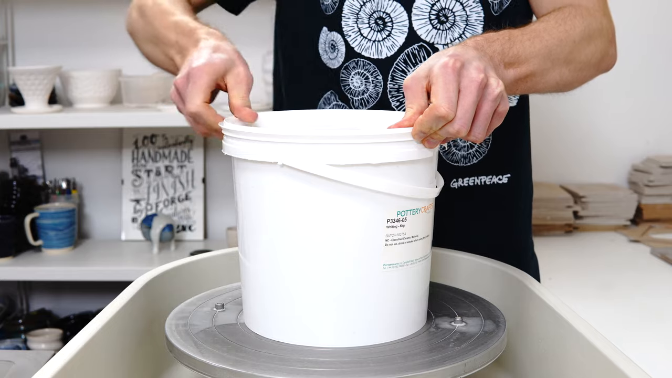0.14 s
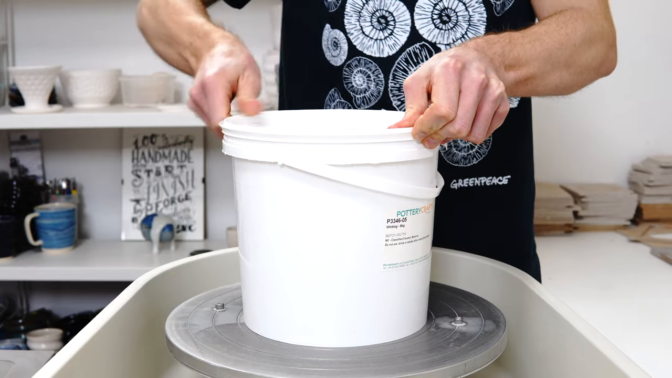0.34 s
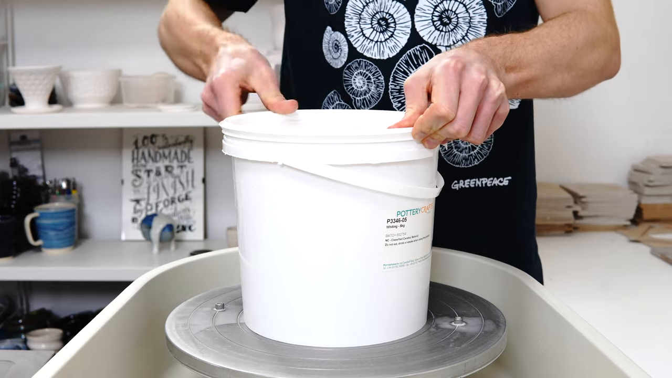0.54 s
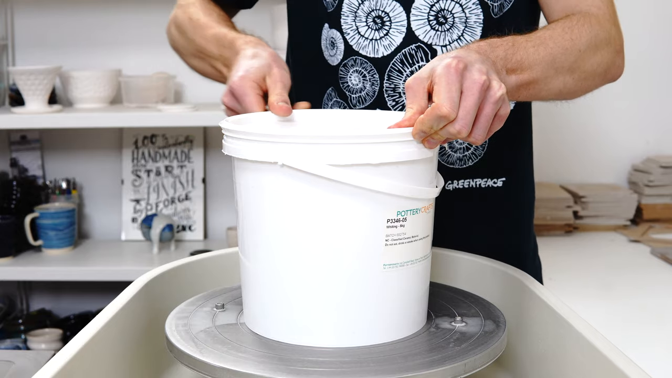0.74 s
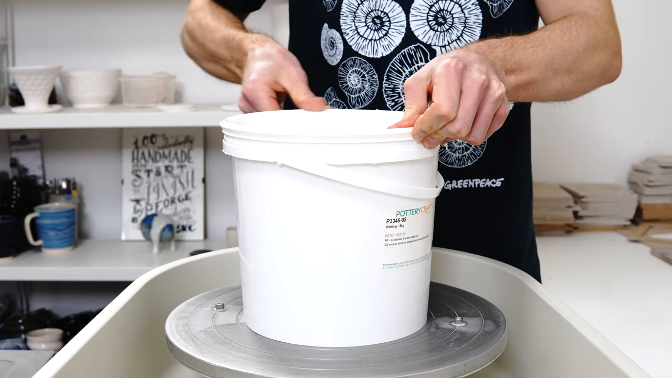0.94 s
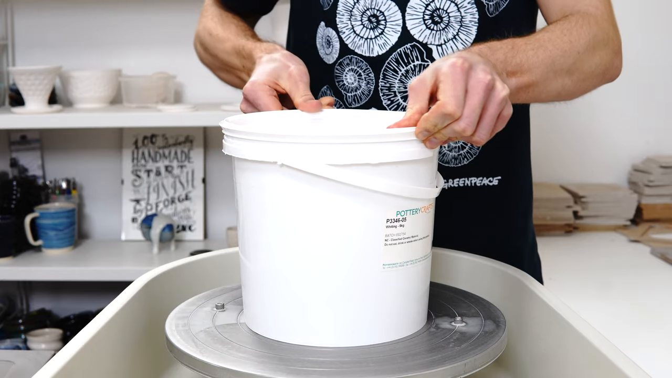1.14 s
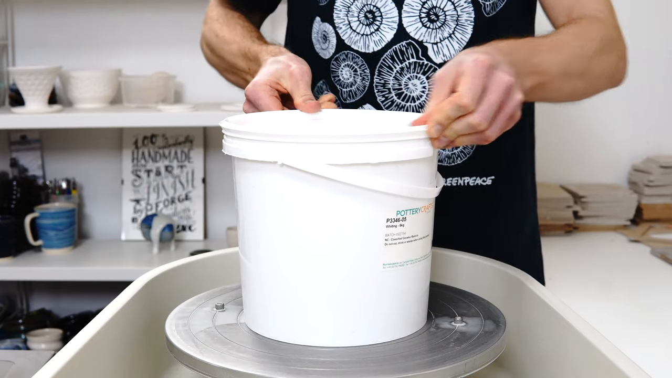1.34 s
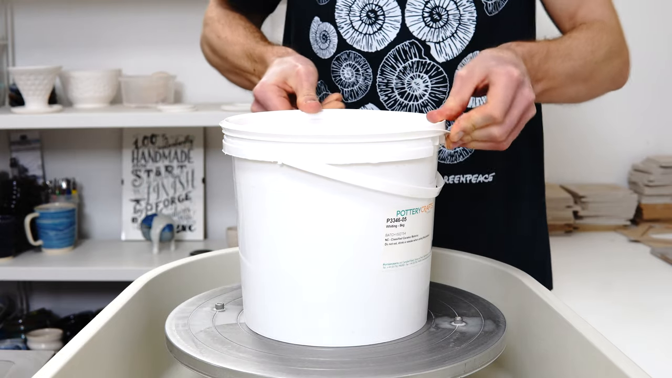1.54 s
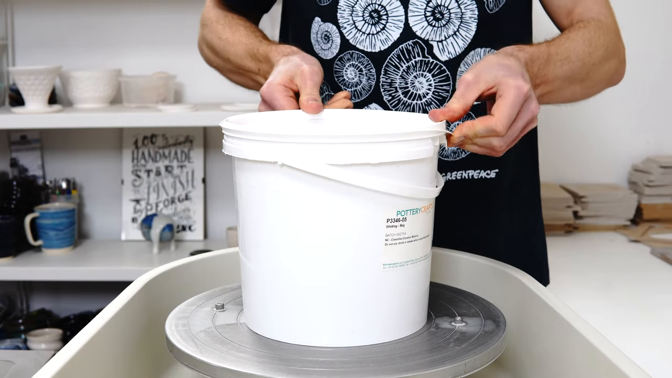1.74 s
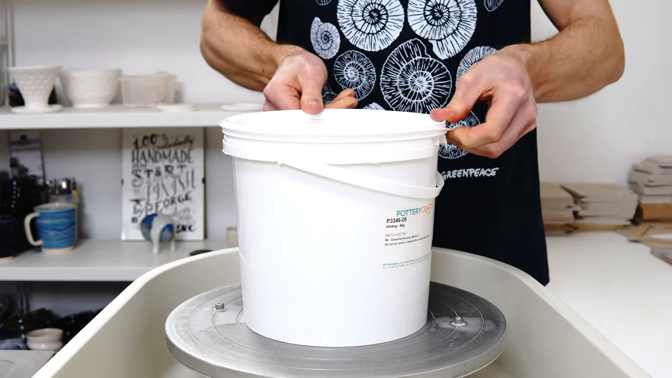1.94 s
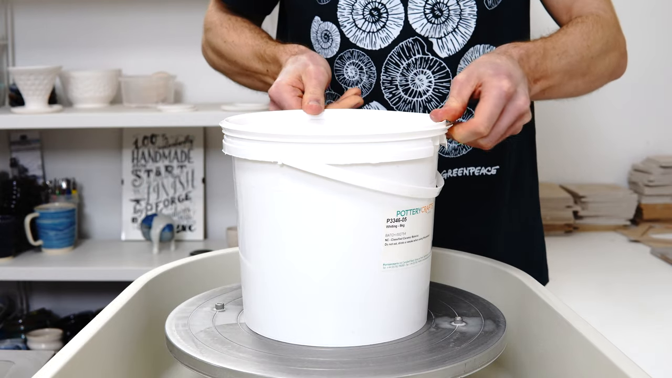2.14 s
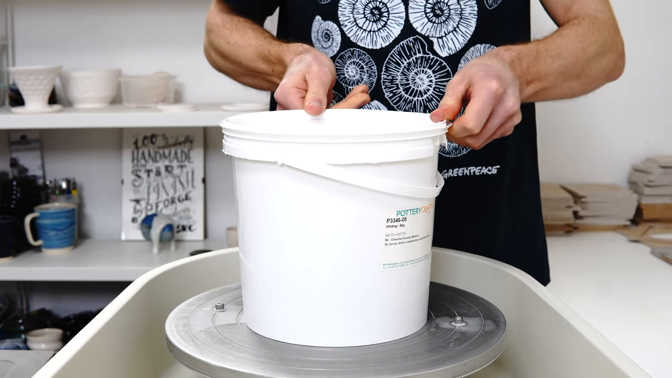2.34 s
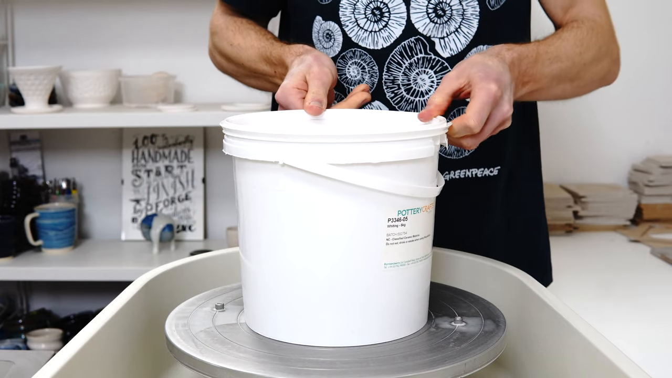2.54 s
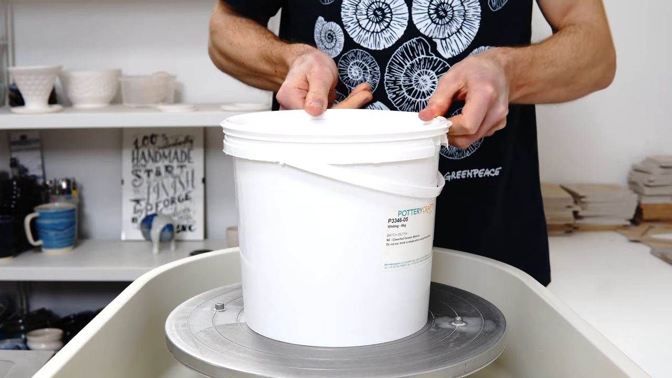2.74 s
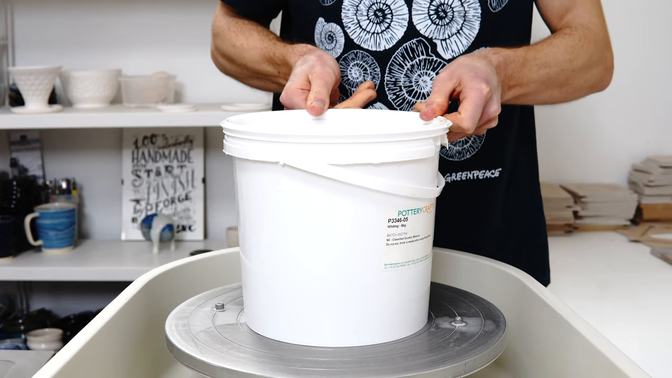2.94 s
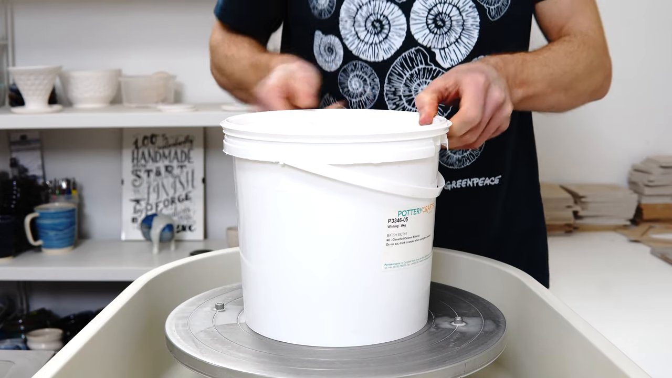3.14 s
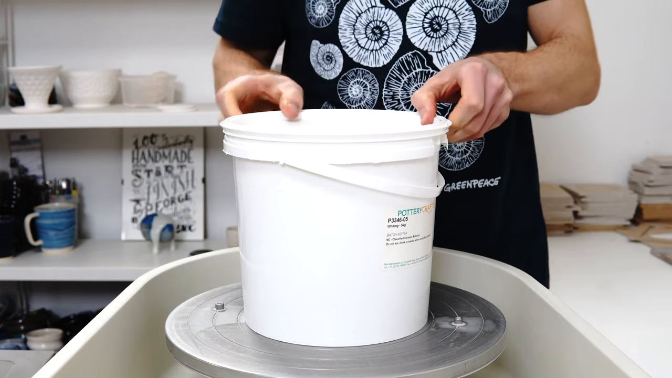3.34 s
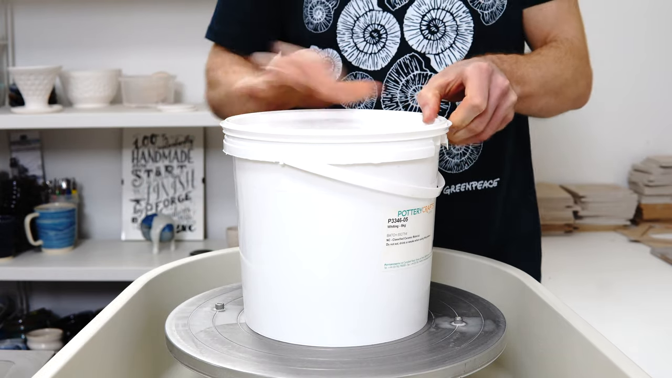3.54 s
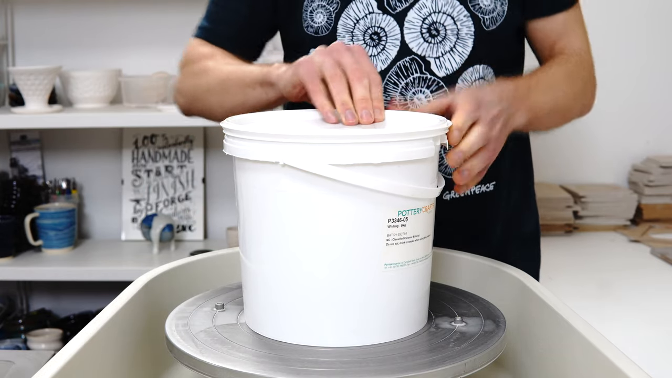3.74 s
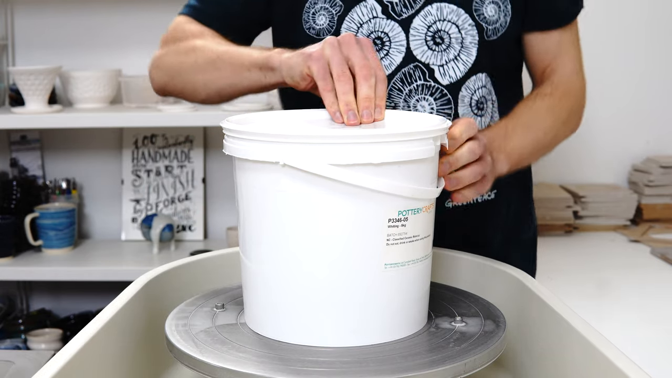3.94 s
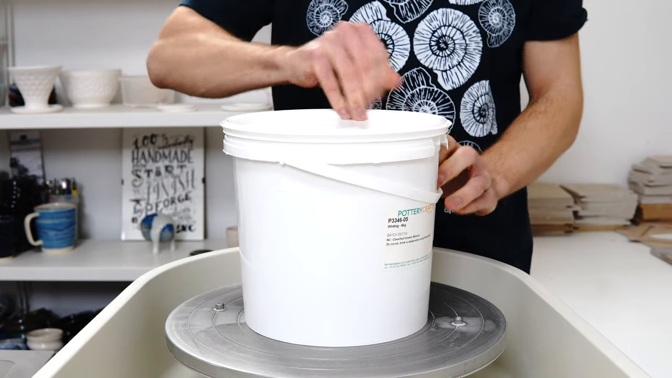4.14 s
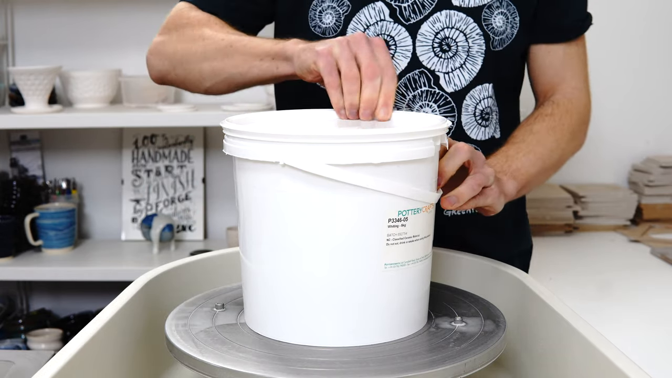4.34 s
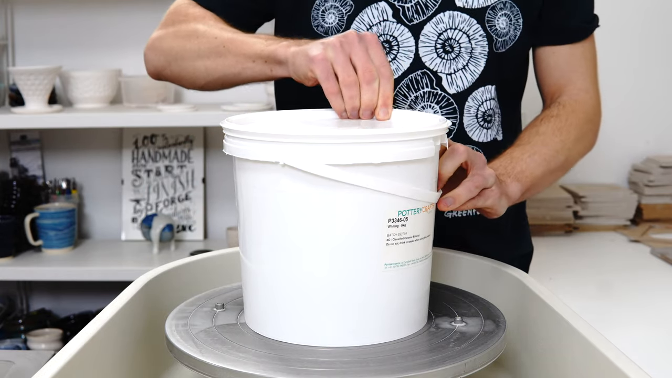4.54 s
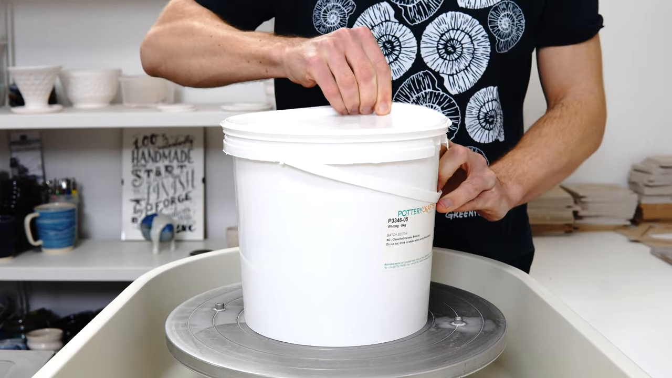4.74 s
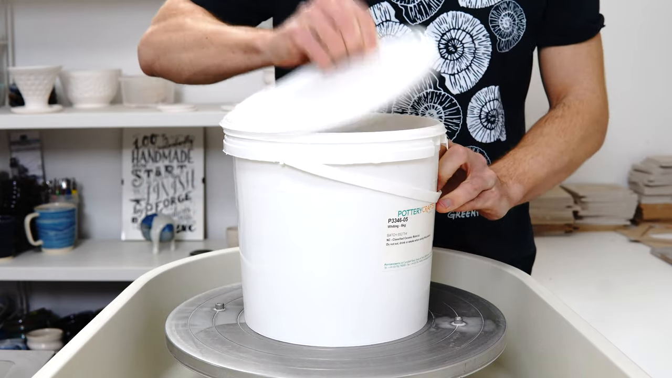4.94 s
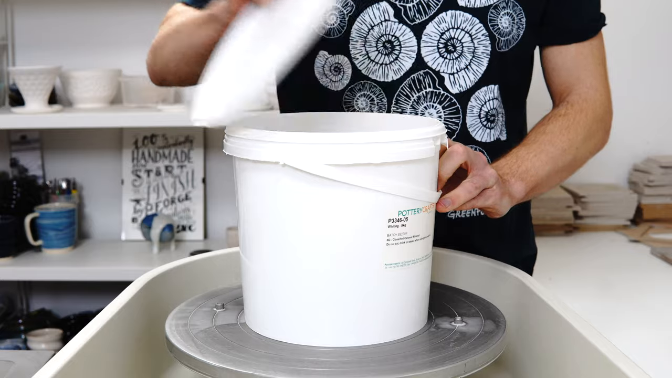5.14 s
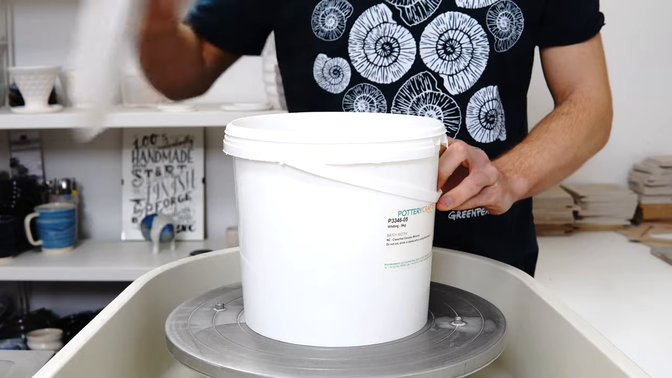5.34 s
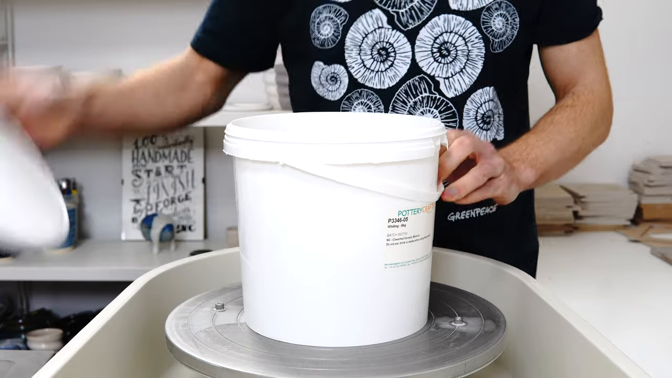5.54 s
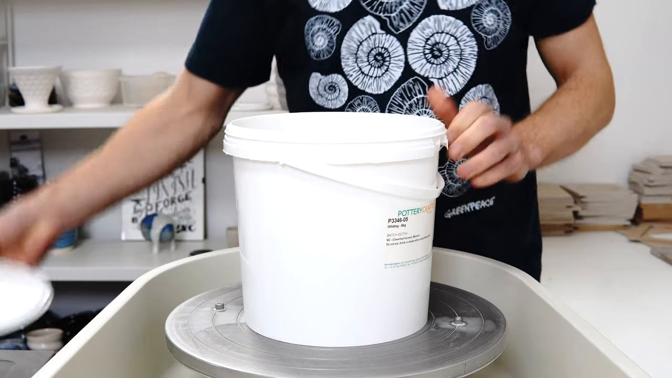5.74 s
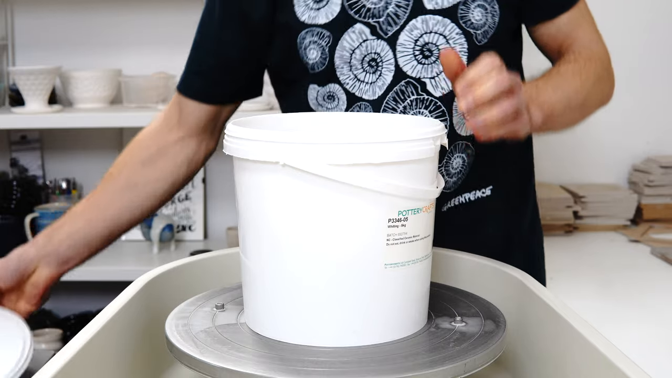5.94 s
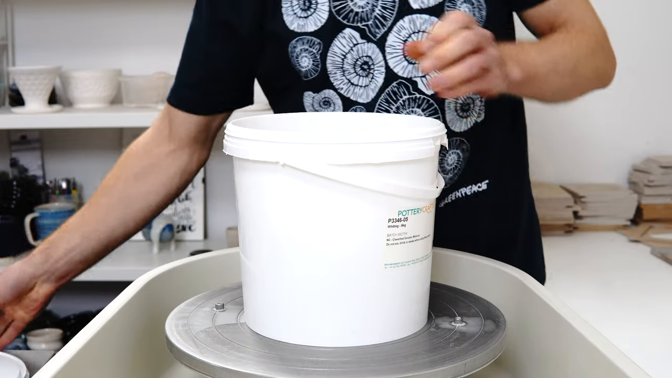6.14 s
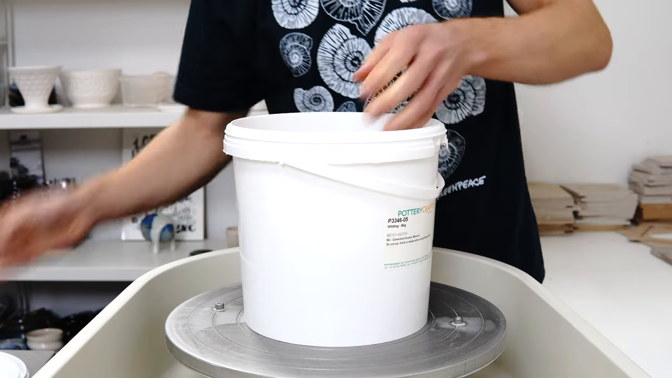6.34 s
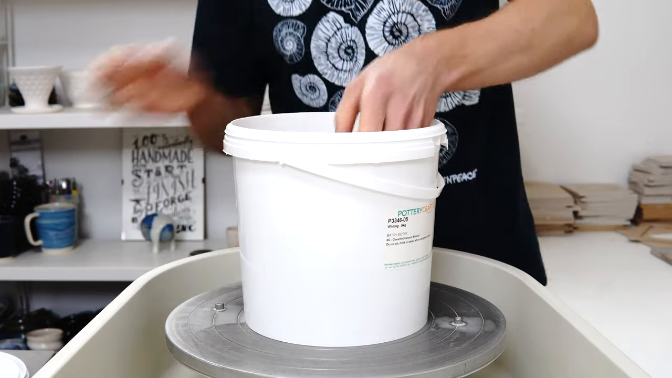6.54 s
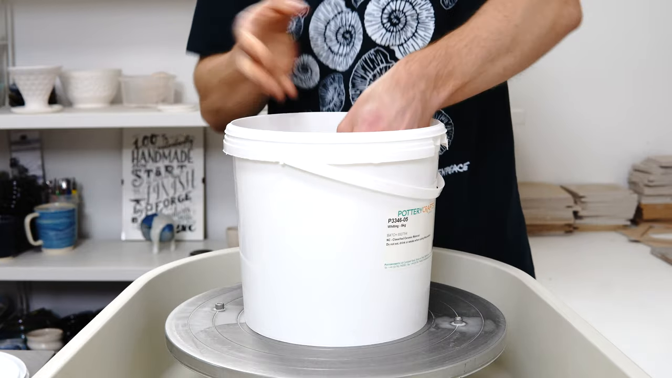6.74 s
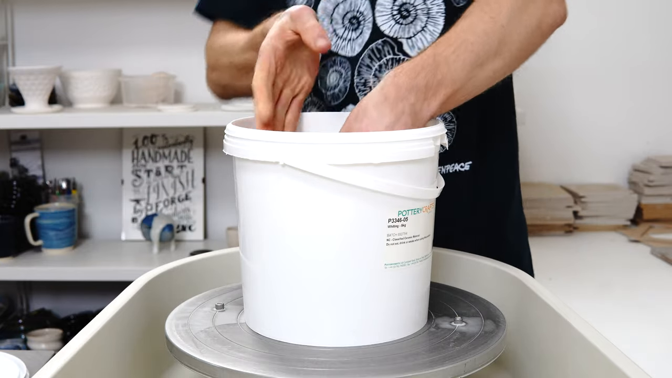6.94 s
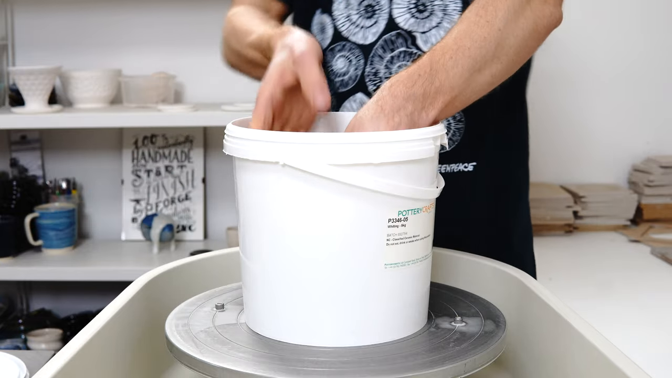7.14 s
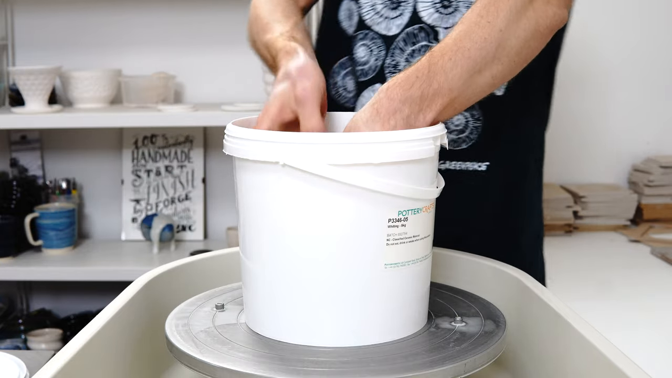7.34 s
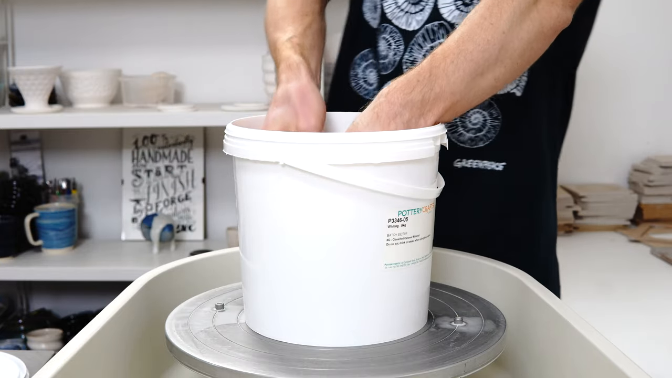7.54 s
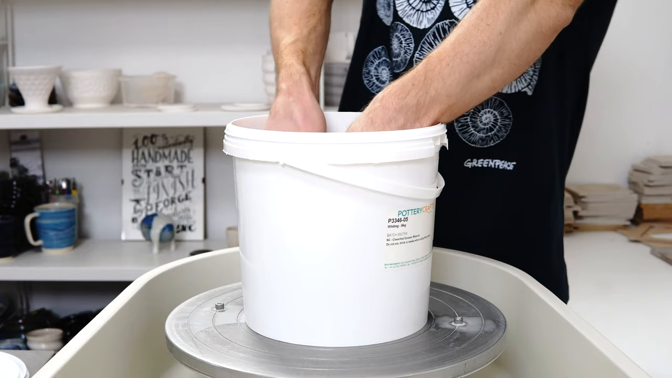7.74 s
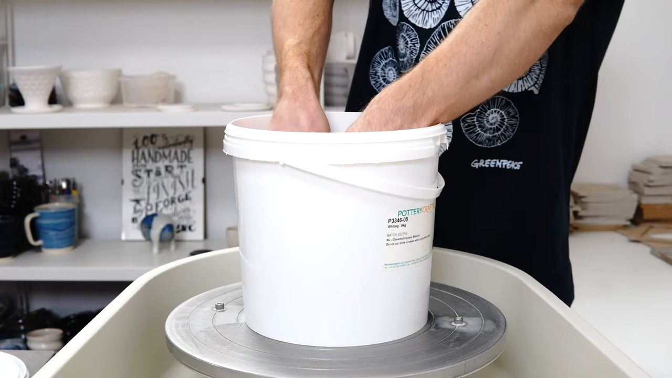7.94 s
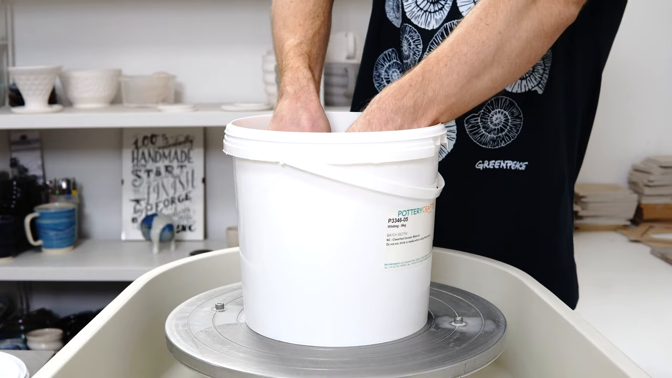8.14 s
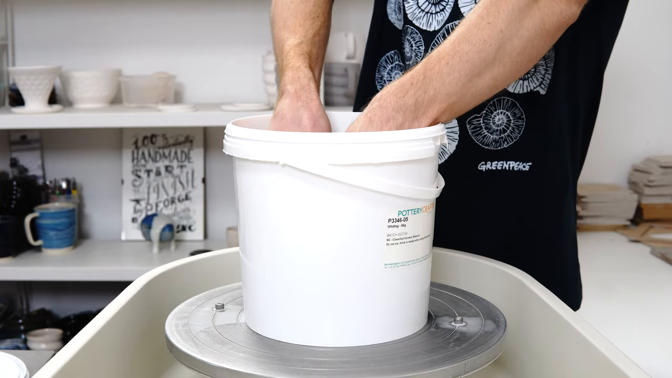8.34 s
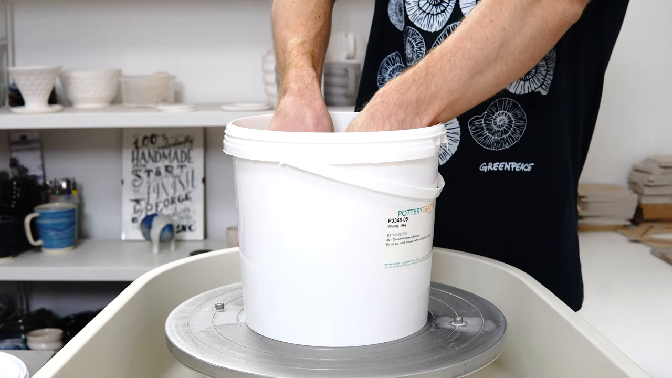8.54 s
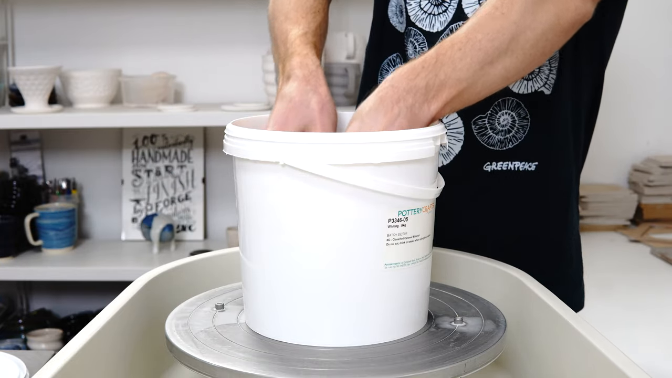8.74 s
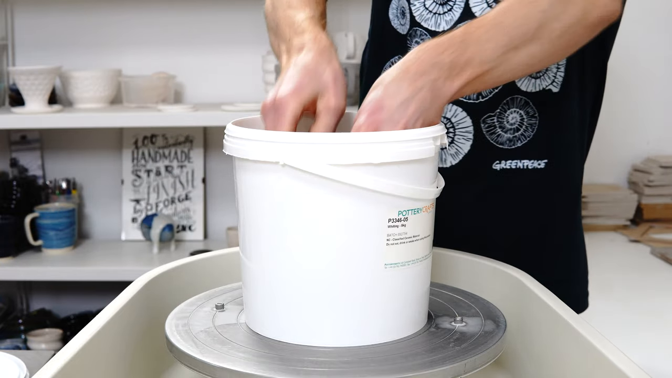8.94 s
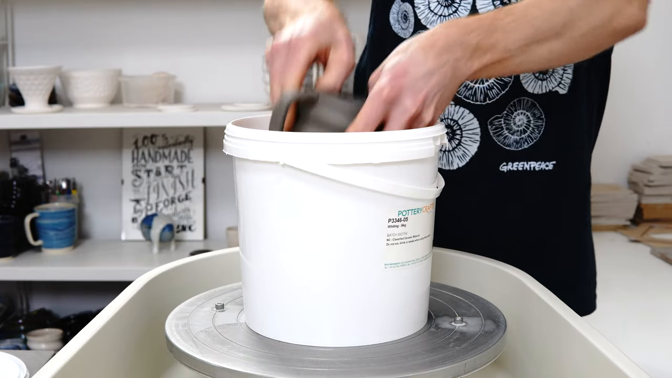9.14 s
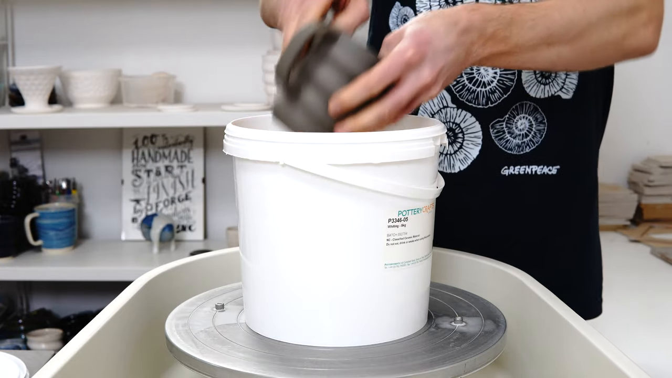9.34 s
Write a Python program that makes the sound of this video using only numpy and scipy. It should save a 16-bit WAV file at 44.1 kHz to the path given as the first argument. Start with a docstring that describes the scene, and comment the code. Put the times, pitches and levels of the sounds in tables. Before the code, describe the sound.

Quiet skin rubbing, one sharp overloaded plastic crack, a burst of hollow pops as the lid lifts, a double clack, then soft knocks inside.

```python
"""A tight plastic lid cracks free of a tub that stands on a metal potter's wheel in a small workshop.
Each crack is filtered contact noise with damped lid modes; the air inside booms at a pitch that rises as the gap opens.
Fingers rub round the rim as trains of tiny slips, and the loose lid squeals softly in narrow resonances.
The lid is dropped on a table and hands knock about in the tub, as coloured impacts with ringing modes.
A low rumble with a faint hiss lies beneath. The loud cracks overload the close microphone."""
import sys
import numpy as np
from scipy import signal
from scipy.fft import rfft, irfft
from scipy.io import wavfile
from scipy.ndimage import uniform_filter1d

SR = 44100
rng = np.random.default_rng(int(sys.argv[2]) if len(sys.argv) > 2 else 0)


def int16_out(signal):
    """Quantize to a 16-bit WAV file."""
    q = np.round(np.clip(np.atleast_2d(signal).T, -1, 1) * 32767)
    wavfile.write(sys.argv[1], SR, q.astype(np.int16))


N = 418068
EVENT_T = np.arange(SR * 3 // 4) / SR  # time axis of one struck or ringing event, s
RELEASE_S = 0.045  # time constant with which every drag of skin dies away

# The rim slips, scuffs and pumps the air in the tub.
# Each row: start in seconds, boom level in dB, scuff level in dB.
SLIPS = [(4.841, -13.5, -28.5), (4.869, -2, -20), (4.901, 3, -22.5), (4.929, 6, -21.5), (4.944, 5.5, -35),
         (4.977, 7.5, -26), (5.003, 1, -20), (5.016, 0.5, -17.5), (5.160, -1.5, -33.5), (5.172, 2.5, -40)]


def lid_snaps():
    """Snap-through buckling: the rim jumps its bead with a crack and excites modes near where the lid flexes."""
    # The lid snaps or is pressed. Each row: start in seconds, crack level in dB, crack tilt in dB per octave,
    # crack decay constant in seconds, ring level in dB, centre of the ring in Hz, its spread in octaves.
    snaps = [(0.344, -34.5, 4, 0.014, -49, 330, .87), (0.524, -42, 1, 0.013, -31, 330, 0.46),
             (0.582, -53, -19, 0.0034, -34, 300, 0.28), (1.58, -41, 3, .0096, -30, 280, 0.25),
             (1.636, -31, -2, 0.0084, -19.5, 290, 0.43), (2.9124, 6, 0.3, 0.0028, 6, 302, .54),
             (2.940, -9, -1.5, 0.0049, -1.5, 172, .37), (2.9752, -17.5, -3.5, 0.0069, -4.5, 176, 0.53),
             (3.717, -40.5, 0, .0036, -30.5, 300, 1), (3.736, -48, 4, 0.003, -17, 200, 0.91),
             (3.749, -37.5, 0.5, 0.004, -12.5, 172, 0.57), (4.129, -11, -1.8, .0014, -2.5, 283, 0.96),
             (4.171, -8.5, -6.5, 0.0055, 2.5, 467, 0.39), (4.410, -39.5, 3, 0.015, -31, 403, 1.07),
             (4.551, -41, 0.5, .009, -45, 400, 1.1), (5.162, -23.5, 3, 0.0071, -17.5, 840, 0.21),
             (6.005, -50.5, 2.5, 0.0017, -67, 388, 1)]
    # The lid on its tub. Each row: frequency in Hz, level in dB before the weighting round the centre,
    # 60 dB decay in seconds before the hand's factor.
    lid_modes = [(168.2, -2.5, 0.31), (270.7, 1, 0.15), (389, -16, 0.21), (477, -9, 0.34), (556, -8.5, .21),
                 (623.7, 0, 0.12), (658, -26, 0.88), (807, -5, 0.25), (1010, -11.5, .28), (1093, -3.5, .19)]
    # Spectrum of a crack. Each row: frequency in Hz, relative level in dB.
    crack_spectrum = [(40, -38.5), (120, -20), (250, -5.5), (420, -2.5), (650, -6), (950, 0.5),
                      (1300, -7.5), (1850, -6), (2300, -7.5), (3200, -6), (4400, -11), (6000, -22.5),
                      (10000, -28.5), (16000, -38)]
    # A hand stays on the lid in light snaps and damps it; hard ones throw it free.
    # Each row: ring level in dB, factor on the decay time.
    hand_freedom = [(-18.5, 0.68), (3, 1.075)]
    # The metal wheel head sings faintly. Each row: start in seconds, level in dB.
    wheel_rings = [(2.913, -26.5), (4.171, -30), (5.739, -46)]

    out = np.zeros(N)
    for s, crack_db, tilt_db, length_s, ring_db, centre_hz, spread in snaps:
        crack = impact(crack_spectrum, tilt_db, length_s, wet_db=-2.0)
        add(out, s, amp(crack_db) * crack)

        freedom = np.interp(ring_db, *np.transpose(hand_freedom))
        modes = np.zeros(len(EVENT_T))
        for k, (hz, db, t60) in enumerate(lid_modes):
            nearness = np.exp(-0.5 * (np.log2(hz / centre_hz) / spread) ** 2)
            sign = (-1) ** k  # neighbouring modes start in opposite directions
            modes += sign * amp(db) * nearness * ring(hz, t60 * freedom)
        add(out, s, amp(ring_db) * in_room(modes, wet_db=-10.5))

    for s in (2.914, 4.171):  # the bent lid springs back, s
        note = spring_back(bent_hz=749, rest_hz=900, settle_s=0.046, t60=0.22)
        add(out, s, amp(-7) * in_room(note, wet_db=-5))
    for s, db in wheel_rings:
        add(out, s, amp(db) * ring(hz=1435, t60=0.75))
    return out


def spring_back(bent_hz, rest_hz, settle_s, t60):
    """Relaxation: the pitch of a mode rises exponentially to rest as the lid regains its shape."""
    return ring(rest_hz + (bent_hz - rest_hz) * np.exp(-EVENT_T / settle_s), t60)


def tub_air(rise_s=0.0025):
    """Cavity resonance: each rim slip sets the air booming at its present pitch; steady dragging makes it hum."""
    # The loose lid is drawn over the rim and keeps the air humming.
    # Each row: start in seconds, length in seconds, level in dB.
    draws = [(4.64, 0.1, -32.5), (4.78, 0.054, -33), (5.06, 0.068, -27.5)]
    # The moving lid shoves air at the microphone. Each row: start in seconds, level in dB, frequency in Hz.
    puffs = [(4.131, -10.5, 106), (4.870, -4, 101), (4.924, -14, 59), (4.14, -16, 50)]
    hum_width_hz = 26
    boom_t60, after_ring_db, after_ring_t60 = 0.095, -34, 0.31  # s, dB, s: fast decay, then a faint hum

    # Narrow-band noise: two slow random signals modulate a cosine and a sine at the air's pitch.
    phase = 2 * np.pi * np.cumsum(air_pitch(np.arange(N) / SR)) / SR
    low_pass = signal.butter(2, hum_width_hz / 2, fs=SR, output="sos")
    waver = signal.sosfilt(low_pass, rng.standard_normal((2, N)))
    hum = unit(waver[0] * np.cos(phase) + waver[1] * np.sin(phase))
    out = drags(draws) * hum

    onset = 1 - np.exp(-(EVENT_T / rise_s) ** 2)
    for s, db, _ in SLIPS:
        hz = air_pitch(s + EVENT_T)
        boom = ring(hz, boom_t60) + amp(after_ring_db) * ring(hz, after_ring_t60)
        add(out, s, amp(db) * onset * boom)
    for s, db, hz in puffs:
        add(out, s, amp(db) * onset * ring(hz, t60=6 / hz))
    return in_room(out, wet_db=-9.0)


def air_pitch(s):
    """Cavity with a neck: the air note rises as the gap under the lid opens."""
    shut_hz, open_hz = 202.3, 324.3  # lid on, lid off
    lift_at_s, lift_s = 4.958, 0.03  # when and how quickly the gap opens
    gap = 0.5 + 0.5 * np.tanh((s - lift_at_s) / (2 * lift_s))
    return shut_hz + (open_hz - shut_hz) * gap


def fingers():
    """Stick-slip friction: skin on plastic gives a rasp, the tub's hollow body, a rim-edge hiss and squeaks."""
    # Fingers drag over the lid. Each row: start in seconds, length in seconds, rasp level in dB,
    # tub body level in dB relative to the rasp, edge hiss level in dB relative to the rasp.
    rubs = [(-0.05, 0.13, -43.5, -1.5, -9.5), (0.11, 0.21, -41.5, -1.5, -10.5),
            (0.32, 0.069, -39, 5.5, -6.5), (0.41, .13, -43, 2.5, -9), (0.569, .14, -43, 3.5, -10.5),
            (0.674, 0.19, -46.5, 1, -8.5), (0.89, 0.093, -43.5, 4, -20), (0.968, 0.046, -39, -2, -6.5),
            (1.32, 0.22, -41, -3, -6.5), (1.52, 0.2, -43.5, 5, -9), (1.871, 0.34, -50, 2.5, -12.5),
            (2.086, 0.21, -46.5, -1, -10.5), (2.266, 0.23, -52, 4.5, -12), (2.469, 0.15, -46, 3, -11.5),
            (2.676, .21, -51, 5, -15), (3.06, 0.14, -46.5, -8, -15), (3.219, 0.083, -43.5, -4, -4.5),
            (3.265, 0.037, -36.5, 1.5, -13), (3.324, 0.033, -38.5, 1, -16), (3.393, .09, -45.5, -2, -11),
            (3.668, 0.034, -50, -3, -7), (3.715, 0.067, -36.5, 1, -14), (3.798, 0.19, -45, 0.5, -14),
            (3.964, 0.2, -40, -2.5, -12), (4.077, 0.092, -31.5, 6.5, -11), (4.227, .25, -49, 1, -11),
            (4.621, 0.093, -42.5, 8, -29), (4.769, 0.091, -44.5, 7.5, -26), (4.821, 0.23, -26, 2, -18),
            (5.085, 0.11, -37.5, 6, -14), (5.424, 0.073, -51, -19, -6.5), (5.482, .14, -47.5, -3, -8.5),
            (5.649, 0.096, -42, -12, -24)]
    # Quick strokes of skin across the lid.
    # Each row: peak time in seconds, level in dB, rise constant in seconds, fall constant in seconds.
    quick_strokes = [(3.505, -20, 0.0038, .011), (3.52, -35, 0.064, 0.063), (4.084, -25, .006, 0.0095),
                     (4.122, -37, .011, .005), (5.72, -44, 0.022, 0.053)]
    # Fingertips slip off the rim's edge.
    # Each row: peak time in seconds, level in dB, time constant to either side in seconds.
    edge_flicks = [(1.465, -45, 0.0097), (4.11, -47, .0048), (4.13, -21.5, .0067), (4.292, -41.5, 0.0071),
                   (4.324, -45, .005), (4.435, -45, .006)]
    # Spectra of rasp, tub body, rim edge and strokes. Each row: frequency in Hz, relative level in dB.
    rub_colour = [(600, -40), (1200, 2.5), (1750, 4.5), (2300, 2), (2900, 3), (3500, 7), (4500, 1),
                  (5600, -3.5), (7000, -15), (11000, -28.5)]
    body_colour = [(100, -9.5), (200, -6), (290, 5.5), (450, -2), (640, -3.5), (760, -2.5), (950, -4),
                   (1300, -9), (2200, -35)]
    edge_colour = [(3500, -22), (5200, 5), (7000, -0.5), (11000, -3.5), (16000, -11)]
    scuff_colour = [(300, -29), (650, -15), (870, -19.5), (1040, -7.5), (1450, -7.5), (1640, -8),
                    (1715, -1.5), (1790, -4.5), (1900, -2.5), (2100, -7), (3700, -4.5), (6900, -25),
                    (10800, -24), (15500, -34)]
    grip_db, grip_body_db, let_go_s = -58.5, 7.5, 5.8  # between drags the gripping hands still creep
    slip_rise_s, slip_fall_s = 0.0015, 0.011  # the scuff of one slip

    t = np.arange(N) / SR
    start, length, rub_db, body_db, edge_db = np.transpose(rubs)
    grip = amp(grip_db) * np.exp(-np.maximum(t - let_go_s, 0) / RELEASE_S)
    rubbing = np.hypot(drags(zip(start, length, rub_db)), grip)
    pressing = np.hypot(drags(zip(start, length, rub_db + body_db)), amp(grip_body_db) * grip)
    on_edge = drags(zip(start, length, rub_db + edge_db))

    rasp = friction(rub_colour, grain_db=2.5, flutter_db=1.2, wet_db=0)
    body = friction(body_colour, grain_db=2.5, flutter_db=1.5, wet_db=-2.5)
    edge = friction(edge_colour, grain_db=1.5, flutter_db=1.2, wet_db=-4)
    squeak = friction(scuff_colour, grain_db=2, flutter_db=1.5, wet_db=-6)

    slip_scuffs = [(s + slip_rise_s, db, slip_rise_s, slip_fall_s) for s, _, db in SLIPS]
    strokes = np.zeros(N)
    for at, db, rise, fall in quick_strokes + slip_scuffs:
        strokes += amp(db) * np.exp(-np.maximum((at - t) / rise, (t - at) / fall))
    flicks = sum(amp(db) * np.exp(-abs(t - at) / spread) for at, db, spread in edge_flicks)
    return rubbing * rasp + pressing * body + (on_edge + flicks) * edge + strokes * squeak


def sliding_lid():
    """Friction-driven resonance: dry skin on the free lid squeals softly in a few narrow bands."""
    # Resonances of the squeal. Each row: frequency in Hz, width in Hz, relative level in dB.
    slide_modes = [(978, 70, 0.5), (1672, 40, -1), (1810, 51, 1.5), (4550, 280, -9.5)]
    # The lifted lid slides in the grip. Each row: start in seconds, length in seconds, level in dB.
    slides = [(5.54, 0.053, -47.5), (5.67, 0.07, -39.5)]
    drag = rng.standard_normal(N)
    squeal = np.zeros(N)
    for hz, width, db in slide_modes:
        b, a = signal.iirpeak(hz, hz / width, fs=SR)
        squeal += amp(db) * unit(signal.lfilter(b, a, drag))
    return unit(squeal) * drags(slides)


def dropped_lid():
    """Repeated impact: the loose lid strikes the table several times and its free modes ring at each blow."""
    # Landings on the table. Each row: start in seconds, level in dB, tilt in dB per octave.
    drops = [(6.0476, 0, 0), (6.0585, -3, -2), (6.173, -25, -1.5), (6.212, -25.5, -3), (6.2416, -2, -1.5),
             (6.2522, -13, -3)]
    # Spectrum of the lid on the table. Each row: frequency in Hz, relative level in dB.
    clack_spectrum = [(40, -27), (110, -14.5), (180, -8.5), (300, 0), (430, -1), (600, 0), (870, 4.5),
                      (1200, -1), (1700, -2), (2600, -4.5), (3700, -4.5), (4700, -15.5), (9000, -25.5),
                      (16000, -34)]
    # The free lid. Each row: frequency in Hz, level in dB relative to the landing, 60 dB decay in seconds.
    loose_modes = [(350, -12, .22), (845, -19, .3), (930, -18, .33), (1210, -19, .28), (1980, -22, .25)]
    out = np.zeros(N)
    modes = sum(amp(db) * ring(hz, t60) for hz, db, t60 in loose_modes)
    for s, db, tilt_db in drops:
        clack = impact(clack_spectrum, tilt_db, contact_s=0.0011, wet_db=-1.5)
        add(out, s, amp(db) * (clack + modes))
    return out


def hands_inside():
    """Impact and friction: dull knocks excite the spot struck and the tub's wall, and hands brush the wall."""
    # Knocks inside the tub. Each row: start in seconds, level in dB, tilt in dB per octave,
    # contact decay constant in seconds, note level in dB, note frequency in Hz.
    knocks = [(6.940, -41, 2, 0.013, -42.5, 201), (6.960, -40, -0.5, 0.011, -21.5, 328),
              (7.017, -46.5, 0, 0.0021, -31, 1020), (7.205, -51, -4.5, .004, -47, 329),
              (7.606, -27.5, -0.5, 0.0038, -21, 770), (7.614, -39, -0.5, 0.0037, -31.5, 248),
              (7.905, -54.5, 5.5, 0.0017, -53, 3400), (8.4034, -41, 0, 0.00089, -25.5, 2520)]
    # Spectra of a knock and of brushing. Each row: frequency in Hz, relative level in dB.
    knock_spectrum = [(60, -24), (150, -6), (250, -4.5), (430, -13.5), (600, -7.5), (790, -1), (1270, -12),
                      (1640, -11), (2100, -19), (2700, -15.5), (4700, -23.5), (10000, -49.5), (16000, -49)]
    brush_colour = [(530, -36), (900, 1), (1010, 3), (1210, -16.5), (1530, -5.5), (1660, -5.5),
                    (2510, -7.5), (3210, -2.5), (7670, -25), (15000, -32)]
    # The ringing wall. Each row: frequency in Hz, level in dB relative to the knock, 60 dB decay in seconds.
    tub_modes = [(244.3, -15, 0.25), (785, -10.5, 0.27), (1700, -11, 0.19), (2410, -17, 0.26)]
    # Hands brush the inside wall. Each row: start in seconds, length in seconds, level in dB.
    brushes = [(7.10, .04, -58), (7.25, 0.12, -44.5), (7.36, .13, -46), (8.57, 0.16, -60.5),
               (8.71, 0.059, -51), (9.04, .10, -42)]
    out = np.zeros(N)
    wall = sum(amp(db) * ring(hz, t60) for hz, db, t60 in tub_modes)
    for s, db, tilt_db, contact_s, note_db, hz in knocks:
        knock = impact(knock_spectrum, tilt_db, contact_s, wet_db=4.0)
        add(out, s, amp(db) * (knock + wall))
        note = in_room(ring(hz, t60=13 / hz), wet_db=-6)
        add(out, s, amp(note_db) * note)
    return out + drags(brushes) * friction(brush_colour, grain_db=2.5, flutter_db=2.5, wet_db=-2)


def room_noise():
    """Stationary coloured noise: white noise shaped in frequency to a low rumble under a faint airy hiss."""
    # Spectrum of the noise. Each row: frequency in Hz, relative level in dB.
    floor_spectrum = [(15, -7), (30, -15.5), (44, 6), (62, -8), (80, -10.5), (102, -9), (135, -15.5),
                      (260, -22), (480, -32.5), (880, -26), (1400, -44), (3500, -47.5), (8000, -55),
                      (16000, -56)]
    hz = np.fft.rfftfreq(N, 1 / SR)
    shaped = rfft(rng.standard_normal(N)) * amp(read(floor_spectrum, hz))
    return amp(-38) * unit(irfft(shaped, N))


def ring(hz, t60):
    """Damped oscillation: one mode dies by 60 dB in t60 seconds; its pitch may be a curve."""
    phase = 2 * np.pi * np.cumsum(hz * np.ones(len(EVENT_T))) / SR
    return np.sin(phase) * np.exp(-np.log(1000) * EVENT_T / t60)


def impact(spectrum, tilt_db, contact_s, wet_db, size=8192):
    """Contact excitation: a short chatter, even in spectrum, is coloured by the object and spread by the room."""
    t = EVENT_T[:size]
    chatter = np.fft.fft(rng.standard_normal(size) * np.exp(-t / contact_s))
    even = np.fft.ifft(chatter / causal(abs(chatter))).real  # flat magnitude; the all-pass keeps a delay of about the contact length
    force = np.zeros(len(EVENT_T))
    force[:size] = even * np.exp(-t / (10 * contact_s))
    sound = in_room(coloured(force, spectrum, tilt_db), wet_db)
    return sound / np.sqrt(np.sum(sound ** 2) / (0.03 * SR))  # energy of 30 ms at rms 1


def friction(spectrum, grain_db, flutter_db, wet_db):
    """Stick-slip: tiny slips of uneven size, at random times, swell and fade in clumps; rms 1."""
    smooth = uniform_filter1d(rng.standard_normal(N), size=400)
    clumps = unit(uniform_filter1d(smooth, size=400))
    sizes = amp(grain_db * np.minimum(rng.exponential(1, N), 5) + flutter_db * clumps)
    slips = sizes * rng.standard_normal(N) * (rng.random(N) < 6000 / SR)  # about 6000 per second
    return unit(in_room(coloured(slips, spectrum), wet_db))


def drags(rows):
    """Energy addition: drags (start s, length s, dB) swell, hold and release, and their powers add."""
    attack_share, swell_power = 0.4, 0.92  # share of the length spent swelling; curve of the swell
    t, power = np.arange(N) / SR, np.zeros(N)
    for start, length, db in rows:
        during = slice(*np.searchsorted(t, [start, start + length + 10 * RELEASE_S]))
        age = t[during] - start
        swell = np.minimum(age / (attack_share * length), 1) ** swell_power
        release = np.exp(-np.maximum(age - length, 0) / RELEASE_S)
        power[during] += (amp(db) * swell * release) ** 2
    return np.sqrt(power)


def room_tail(build_s=0.00067):
    """Diffuse reverberation: dense reflections build up and die band by band; energy 1."""
    # Decay of the room. Each row: frequency in Hz, 60 dB decay in seconds.
    room_t60 = [(100, 0.32), (300, 0.21), (900, 0.34), (3500, 0.3), (7000, 0.28), (15000, 0.22)]
    hz, t, z = signal.stft(rng.standard_normal(len(EVENT_T)), SR, nperseg=256)
    decay = amp(-60 * t / read(room_t60, hz)[:, None])
    tail = signal.istft(z * decay, SR, nperseg=256)[1][:len(EVENT_T)]
    tail *= 1 - np.exp(-EVENT_T / build_s)
    return tail / np.linalg.norm(tail)


def in_room(x, wet_db):
    """Superposition: the direct sound plus its reflections, by convolution."""
    return x + amp(wet_db) * signal.oaconvolve(x, room_tail())[:len(x)]


def causal(gain):
    """Minimum phase: the spectrum with these magnitudes that responds as early as possible."""
    return np.exp(signal.hilbert(np.log(gain + 1e-9)).conj())


def coloured(x, spectrum, tilt_db=0, size=4096):
    """Linear filtering: a causal response of unit energy with the given spectrum, tilted about 1 kHz."""
    hz = abs(np.fft.fftfreq(size, 1 / SR))
    octaves = np.log2(np.maximum(hz, 150) / 1000)  # the tilt stops below 150 Hz
    gain = amp(read(spectrum, hz) + tilt_db * octaves)
    taps = np.fft.ifft(causal(gain)).real
    return signal.oaconvolve(x, taps / np.linalg.norm(taps))[:len(x)]


def read(points, hz):
    """Interpolates a spectrum on a log-frequency axis."""
    f, value = np.transpose(points)
    return np.interp(np.log(hz + 1), np.log(f), value)


def amp(db):
    """Level to amplitude: decibels to gain."""
    return 10 ** (np.asarray(db) / 20)


def unit(x):
    """Normalisation: scales to rms 1."""
    return x / np.sqrt(np.mean(x ** 2) + 1e-20)


def add(mix, s, sound):
    """Superposition: adds a sound into the mix, in place, from time s."""
    part = mix[round(s * SR):][:len(sound)]
    part += sound[:len(part)]


def scene():
    """Superposition: all sources add at one microphone."""
    lid = lid_snaps() + tub_air() + fingers() + sliding_lid()
    return (lid + dropped_lid() + hands_inside() + room_noise())[None]


def record(dry, limit_db=-3.5, recover_db_per_s=220, attack_s=0.0079):
    """Limiting: gain falls as smoothed power passes a threshold; early peaks clip; a low-pass limits the band."""
    keep = np.exp(-1 / (attack_s * SR))
    power = signal.lfilter([1 - keep], [1, -keep], dry[0] ** 2)
    power_db = 10 * np.log10(power + 1e-12)
    # Peak hold that sinks at a constant rate in dB.
    fall = np.arange(N) * recover_db_per_s / SR
    held_db = np.maximum.accumulate(power_db + fall) - fall
    over_db = np.maximum(held_db - limit_db, 0)
    clipped = np.clip(dry / amp(over_db), -1, 1)
    low_pass = signal.firwin(255, 15800, window=("kaiser", 8), fs=SR)  # cutoff in Hz
    return signal.oaconvolve(clipped, low_pass[None], "same")


dry = scene()
out = record(dry)
int16_out(out)
```